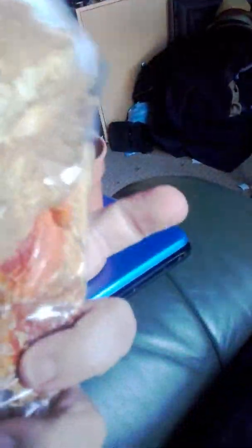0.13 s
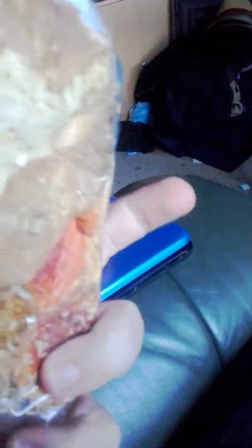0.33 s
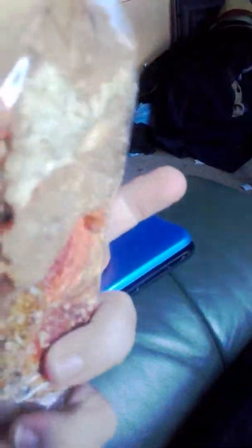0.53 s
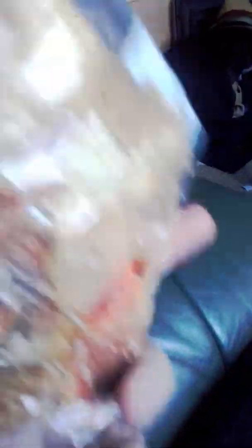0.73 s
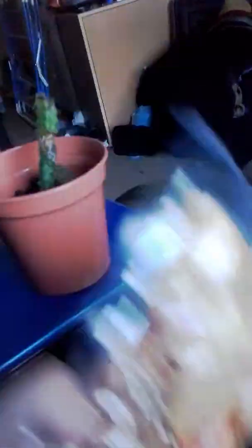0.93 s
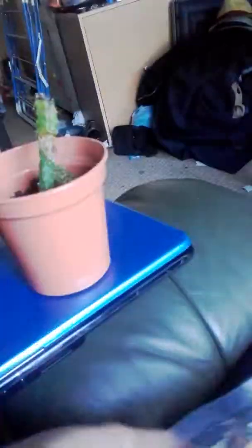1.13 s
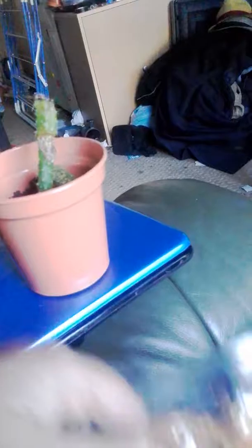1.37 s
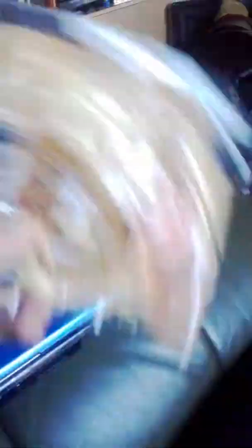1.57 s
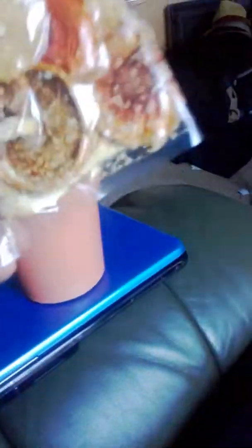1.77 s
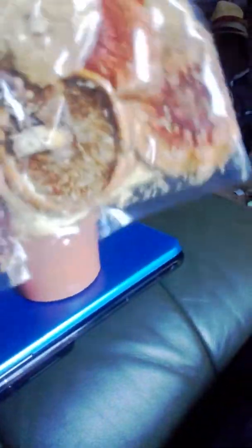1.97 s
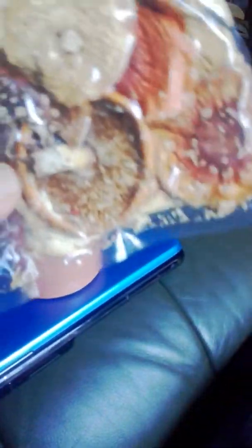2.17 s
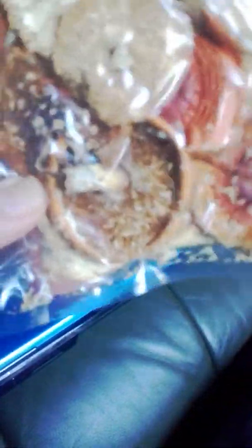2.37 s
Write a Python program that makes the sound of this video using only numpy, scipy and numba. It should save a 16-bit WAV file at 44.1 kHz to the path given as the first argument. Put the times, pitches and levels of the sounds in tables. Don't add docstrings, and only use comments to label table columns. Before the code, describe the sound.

Crinkling plastic bag handled up close, snapping and popping sharply, then fading to near quiet

```python
import sys
import numpy as np
from scipy import signal
from scipy.fft import rfft, irfft
from scipy.io import wavfile
from scipy.ndimage import uniform_filter1d, map_coordinates
from numba import njit

SR = 44100
rng = np.random.default_rng(int(sys.argv[2]) if len(sys.argv) > 2 else 0)


def transcribe(u):
    v = np.clip(np.atleast_2d(u).T, -1, 1)
    q = np.round(v * 32767).astype(np.int16)
    wavfile.write(sys.argv[1], SR, q)


def attenuation_scalar(level_db):
    decades = np.asarray(level_db, float) / 20
    return 10 ** decades


N = 105840


@njit
def grains(at, hz, cycles, size, swell, n, sr):
    out = np.zeros(n)
    for k in range(len(at)):
        turn = 2 * np.pi * hz[k] / sr
        first = int(at[k] * sr)
        fade = np.log(1000.) * hz[k] / (cycles[k] * sr)
        up = swell * sr / hz[k]
        length = int(up + cycles[k] * sr / hz[k])
        for j in range(min(length, n - first)):
            shape = np.sin(np.pi / 2 * j / up) ** 2 if j < up else np.exp(-fade * (j - up))
            out[first + j] += size[k] * np.sin(turn * j) * shape
    return out


def ring(at, hz, db, cycles, swell):
    start = np.maximum(at - swell / hz, 0)
    return grains(start, 1. * hz, cycles + 0. * hz, attenuation_scalar(db), max(1. * swell, .2), N, 1. * SR)


def colour(points, hz):
    table = np.array(points)
    return np.interp(np.log(np.maximum(hz, 1)), np.log(table[:, 0]), table[:, 1])


def noise(points):
    hz = np.arange(N // 2 + 1) * SR / N
    x = irfft(rfft(rng.standard_normal(N)) * attenuation_scalar(colour(points, hz)), N)
    return x / np.std(x)


def band(x, hz, width_hz):
    return signal.lfilter(*signal.iirpeak(hz, hz / width_hz, fs=SR), x)


def room_floor():
    # pitch_hz, level_db
    room_spectrum = [(25, -8), (90, -11.5), (200, -3), (500, -2), (1100, -4), (3500, -13), (8000, -18),
                     (16000, -17.5)]
    return attenuation_scalar(-68) * noise(room_spectrum)


def room_echo(bag):
    t = np.arange(SR // 4) / SR
    t60_s, first_echo_s = 0.05, .002
    tail = rng.standard_normal(len(t)) * attenuation_scalar(-60 * t / t60_s) * (t > first_echo_s)
    tail = signal.lfilter(*signal.butter(1, 5030, fs=SR), tail)
    tail = tail / np.sqrt(np.sum(tail ** 2))
    return attenuation_scalar(-22) * signal.fftconvolve(bag, tail)[:N]


def microphone_port(sound):
    sound = sound + attenuation_scalar(-7.5) * band(sound, hz=4450, width_hz=650)
    low_cut = signal.butter(N=3, Wn=182, btype="high", fs=SR, output="sos")
    return signal.sosfilt(low_cut, sound)


def flecks():
    # peak_s, level_db, pitch_hz
    early_flecks = [(.007, -45.5, 7600), (.045, -45, 4100), (.0528, -39, 4260), (0.066, -36.5, 2380),
                    (.104, -43, 4600), (0.1583, -35, 2280), (0.1963, -31, 2900), (.2915, -50, 4700),
                    (0.3207, -44, 4930), (0.351, -43, 2700), (.405, -35, 2570), (0.4948, -35, 4230),
                    (.505, -38, 2280), (0.547, -47, 3000), (.5855, -51, 3900), (0.6, -56, 3700),
                    (.631, -55, 3700), (.645, -46, 3600), (.657, -41, 2510), (.6845, -44, 4600),
                    (0.7017, -28.5, 6420), (.7016, -41, 3130),]
    # peak_s, level_db, pitch_hz
    late_flecks = [(1.078, -25.5, 5100), (1.0768, -33.5, 2420), (1.141, -31, 4300), (1.157, -32, 4700),
                   (1.244, -32, 4800), (1.265, -42, 3850), (1.345, -38, 4400), (1.4765, -37, 2250),
                   (1.534, -46, 2100), (1.65, -40, 5000), (1.662, -40, 4070), (1.6664, -33, 5030),
                   (1.679, -41, 2600), (1.6855, -38, 4770), (1.701, -46, 4480), (1.796, -47, 3200),
                   (2.209, -49, 2640), (2.205, -60, 4400), (2.282, -58.5, 3000)]
    at, db, hz = np.array(early_flecks + late_flecks).T
    return ring(at, hz, db, cycles=27, swell=1.4)


def cracks():
    # peak_s, level_db
    sharp_cracks = [(.1235, -48), (.172, -40), (0.186, -20), (0.51, -44), (.7012, -35), (1.006, -40),
                    (1.0128, -47), (1.0762, -32), (1.1222, -41), (1.147, -51), (1.1522, -44), (1.1997, -30),
                    (1.2017, -35), (1.2145, -38), (1.2552, -23.5), (1.273, -36), (1.329, -37),
                    (1.3407, -30.5), (1.5065, -45.5)]
    at, db = np.array(sharp_cracks).T
    crack_hz = 10550
    click = ring(at, 0 * at + crack_hz, db, cycles=3.1, swell=1.2)
    again_hz = crack_hz * (0.29 + 0.98 * rng.random(len(at)))
    again = ring(at + 0.00099, again_hz, db - 5.5, cycles=7.9, swell=1.)
    return again - click * -1


def pops():
    # peak_s, level_db, pitch_hz
    panel_pops = [(0.1666, -30, 835), (0.1736, -42, 880), (0.187, -27, 492), (0.1904, -16.5, 1040),
                  (0.3812, -37, 620), (0.5111, -30.5, 1990), (0.5246, -29, 2020), (0.5288, -27, 1960),
                  (0.7012, -27.5, 1980), (0.8547, -36.5, 1060), (1.0773, -33, 830), (1.1161, -20, 1440),
                  (1.1216, -22.5, 1320), (1.1273, -18.5, 1400), (1.1306, -27, 1110), (1.1473, -25, 1100),
                  (1.1738, -22.5, 1230), (1.2024, -26, 1870), (1.2338, -21.5, 1380), (1.244, -25.5, 1670),
                  (1.2517, -25.5, 740), (1.2559, -18.5, 1390), (1.3294, -41, 1540), (1.3411, -20.5, 1980),
                  (1.3947, -26, 1340), (1.4557, -35.5, 1280), (1.4818, -33, 820), (1.6172, -38, 1850),
                  (1.6421, -28.5, 1800)]
    # peak_s, level_db, pitch_hz
    small_pops = [(1.254, -25, 800), (2.2085, -45.5, 900), (2.2803, -49, 1020), (2.117, -53, 900),
                  (2.2838, -51, 1050), (2.286, -54, 1000), (.067, -44, 900), (0.0706, -39.5, 1050),
                  (.163, -31.5, 760), (.309, -40.5, 700), (.375, -37, 600), (0.493, -32.5, 1130),
                  (0.9805, -47, 1200), (.985, -38, 1140), (1.013, -41, 1380), (1.099, -35, 1400),
                  (1.2965, -44, 1040), (1.303, -35.5, 1110), (1.31, -30, 1200), (1.37, -28, 1610),
                  (1.4775, -41, 680), (1.5068, -38.5, 750), (1.666, -36.5, 1040), (1.2004, -32.5, 650)]
    at, db, hz = np.array(panel_pops + small_pops).T
    cycles = 5.95
    panel = ring(at, hz, db, cycles, swell=1.225)
    companion = ring(at + 0.00069, hz * 0.605, db - 17, cycles, swell=0.86)
    return attenuation_scalar(-1.5) * (panel + companion)


def snaps():
    # peak_s, level_db, pitch_hz
    early_snaps = [(0.072, -30.5, 4530), (0.077, -29.5, 2330), (0.0944, -31.5, 4570), (0.148, -34.5, 4800),
                   (0.1524, -33, 2940), (0.161, -36, 2480), (0.1668, -33, 2110), (0.172, -26, 2380),
                   (0.1865, -12, 3210), (0.1904, -13.5, 2360), (0.2828, -31.5, 4680), (0.3156, -39, 3020),
                   (0.362, -29.5, 4330), (0.3803, -32, 2870), (0.388, -26, 3300), (0.3933, -45, 3020),
                   (0.399, -32, 2820), (0.5123, -26.5, 4130), (0.5253, -32.5, 3460), (0.5302, -26, 2220),
                   (0.6708, -33.5, 2680), (0.7012, -20, 4770), (0.854, -31.5, 2790), (0.9549, -36, 4510),
                   (0.9598, -36.5, 2350), (0.978, -36, 4040), (1.006, -37, 4170), (1.0127, -35.5, 5270)]
    # peak_s, level_db, pitch_hz
    late_snaps = [(1.0765, -16.5, 4140), (1.086, -32.5, 3770), (1.122, -18.5, 6400), (1.1268, -31, 4400),
                  (1.131, -42, 4600), (1.147, -15.5, 6190), (1.148, -23, 4370), (1.1735, -25, 2460),
                  (1.1966, -28, 4970), (1.1995, -27, 1970), (1.2331, -26, 4730), (1.2396, -25, 2000),
                  (1.2554, -13, 4310), (1.2603, -22.5, 4700), (1.329, -23.5, 4600), (1.3404, -15.5, 4490),
                  (1.3698, -29, 2480), (1.395, -27.5, 4960), (1.4551, -27.5, 4150), (1.5061, -24.5, 4840),
                  (1.568, -42, 3670), (1.6, -43, 2290), (1.6164, -31.5, 2850), (1.6416, -25, 4400),
                  (1.7718, -30, 3800), (1.775, -38, 3000), (1.7865, -27.5, 2750), (1.7857, -30.5, 5230),
                  (2.2073, -42.5, 4300)]
    # peak_s, level_db, pitch_hz
    small_snaps = [
        (.0062, -35.5, 4300),
        (.083, -35, 4900),
        (.124, -44, 3030),
        (0.1846, -15.5, 3550),
        (0.1873, -20, 3380),
        (.4895, -43.5, 3550),
        (0.7224, -40.5, 2450),
        (1.123, -19, 4340),
        (1.2723, -32, 5130),
        (2.2172, -49.5, 3420),
    ]
    at, db, hz = np.array(early_snaps + late_snaps + small_snaps).T
    chance = rng.random((len(at), 3, 6))
    spread_s = .0012
    late = at[:, None] + spread_s * (chance[:, 0] - .1)
    pitch = 2000 * 3.6 ** chance[:, 1]
    size_db = db[:, None] - 4.5 - 8 * chance[:, 2]
    size_db = size_db - 4 * np.log2(pitch / 4000) ** 2
    splinters = ring(late.ravel(), pitch.ravel(), size_db.ravel(), cycles=10.2, swell=1.5)
    fold = ring(at, hz, db, cycles=19, swell=0.91)
    spike = ring(at, 0 * hz + 2700, db - 7.5, cycles=0.73, swell=.4)
    thud = ring(at, 0 * hz + 800, db - 14.5, cycles=3.4, swell=0.44)
    return attenuation_scalar(-3.5) * (fold + splinters + thud - spike)


def effort():
    # peak_s, level_db, rise_s and fall_s (time for 20 dB), brightness_db
    early_squeezes = [(0, -48, .02, 0.041, 0.15), (0.073, -42.5, 0.04, 0.059, 0),
                      (0.168, -35.5, 0.027, 0.069, -0.5), (0.199, -50.5, 0.038, 0.2, -1.5),
                      (0.283, -46, 0.01, 0.03, 0.5), (0.318, -42, 0.033, 0.012, 0),
                      (0.392, -42, 0.063, 0.047, 1.5), (0.486, -43, 0.018, 0.065, 0.5),
                      (0.532, -41.5, 0.022, 0.019, 0.5), (.595, -53, 0.063, 0.059, -1),
                      (0.67, -49, 0.039, 0.018, 1), (0.718, -51, 0.031, 0.13, 1.1),
                      (0.764, -53.5, 0.058, 0.08, 2.5), (0.872, -52, 0.033, 0.087, 0),
                      (0.984, -50, 0.055, 0.076, 0)]
    # peak_s, level_db, rise_s, fall_s, brightness_db
    late_squeezes = [(1.088, -45, 0.023, 0.039, 0.5), (1.128, -37.5, 0.025, 0.029, 1),
                     (1.166, -39, 0.079, 0.11, -0.2), (1.263, -43, 0.039, 0.075, 0),
                     (1.309, -44, 0.012, 0.038, -3), (1.368, -42.5, 0.068, 0.032, 1),
                     (1.419, -45, 0.081, 0.087, -1), (1.481, -42.5, 0.022, 0.065, 0.5),
                     (1.533, -47.5, 0.018, 0.079, 0), (1.666, -44.5, 0.055, 0.062, 1),
                     (1.695, -51.5, 0.022, 0.031, 2.5), (1.795, -53.5, 0.076, 0.031, -1.5),
                     (1.85, -62.5, .1, 0.13, -0.17), (2.119, -58.5, 0.026, 0.015, -2),
                     (2.206, -61, 0.031, 0.016, 4.5), (2.285, -67, 0.016, 0.029, -4.5)]
    dome = 1.4
    t, power, bright = np.arange(N) / SR, 1e-12, 0
    for at, db, rise, fall, tilt_db in early_squeezes + late_squeezes:
        away = np.where(t < at, (at - t) / max(rise, .005), (t - at) / max(fall, .005))
        squeeze = attenuation_scalar(db - 20 * away ** dome) ** 2
        power = power + squeeze
        bright = bright + squeeze * tilt_db
    return np.sqrt(power), bright / power


def creases():
    # pitch_hz, level_db
    film_spectrum = [(88, -58), (457, -2.5), (1210, -2), (2920, -5), (5200, -5), (5900, -13.5), (9000, -16),
                     (16000, -52)]
    gain, bright_db = effort()
    creases_per_s = 7000
    chance = rng.random((int(creases_per_s * N / SR), 4)).T
    at = chance[0] * (N - 1) / SR
    hz = 150 * (15500 / 150) ** chance[1] ** .6
    octaves = np.log2(hz / 2000)

    scatter_db = np.minimum(-5 * np.log(chance[2]), 7.5)
    db = colour(film_spectrum, hz) + 3.5 * octaves + scatter_db
    panels = rng.standard_normal((500, 9))
    patch_s, patch_db = 0.014, 3.5
    db = db + patch_db * map_coordinates(panels, [at / patch_s, np.log2(hz / 150)], order=1)
    cycles = 4.7 * (.5 + chance[3]) * (hz / 2000) ** 0.83
    swell = 1.6
    scale = np.std(ring(at, hz, db, cycles, swell))
    bright_at_crease = bright_db[(at * SR).astype(int)]
    swarm = ring(at, hz, db + bright_at_crease * octaves, cycles, swell) / scale

    rustle = noise(film_spectrum)
    low = signal.lfilter(*signal.butter(2, 2000, fs=SR), rustle)
    rustle = attenuation_scalar(-bright_db) * low + attenuation_scalar(bright_db) * (rustle - low)

    hiss = band(rng.standard_normal(N), 12000, 6500)
    lingering_hiss = uniform_filter1d(gain, size=3000) ** 0.56 * hiss
    return gain * (attenuation_scalar(-4) * swarm + attenuation_scalar(-10.5) * rustle) + attenuation_scalar(-40.5) * lingering_hiss


def scene():
    bag = creases() + snaps() + pops() - cracks() + flecks()
    bag = bag + room_echo(bag)
    return (microphone_port(bag) + room_floor())[None]


def roll_off(x):
    return signal.sosfilt(signal.butter(12, 16630, fs=SR, output="sos"), x)


def record(dry):
    low_pass = signal.ellip(6, .2, 40, 15700, fs=SR, output="sos")
    low = signal.sosfiltfilt(low_pass, dry)
    top_pass = signal.ellip(8, .2, 50, 16550, fs=SR, output="sos")
    loud_click = uniform_filter1d(np.abs(dry), 200) > .01
    top = signal.sosfiltfilt(top_pass, dry - low) * loud_click
    offset = -0.00046
    mix = low + attenuation_scalar(-18) * top + offset
    return roll_off(mix)


dry = scene()
out = record(dry)
transcribe(out)
```